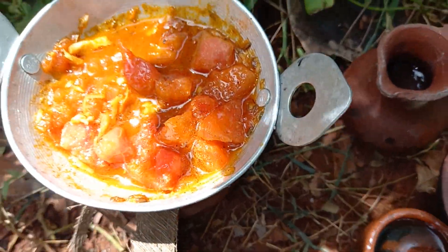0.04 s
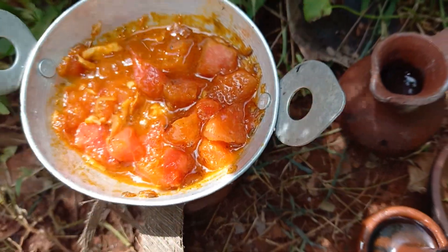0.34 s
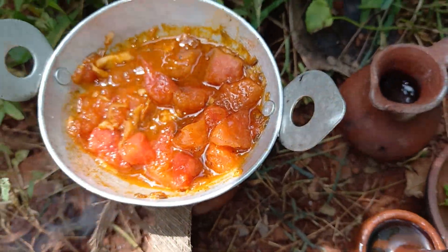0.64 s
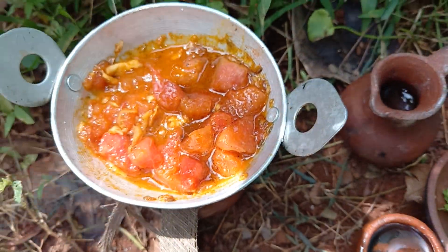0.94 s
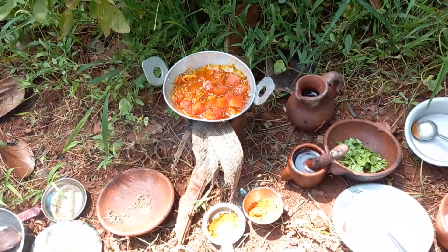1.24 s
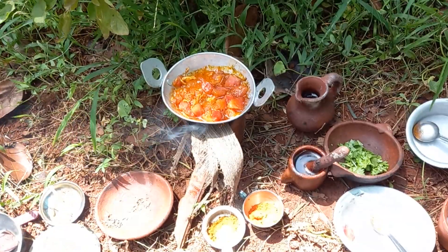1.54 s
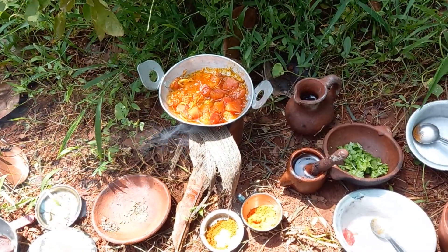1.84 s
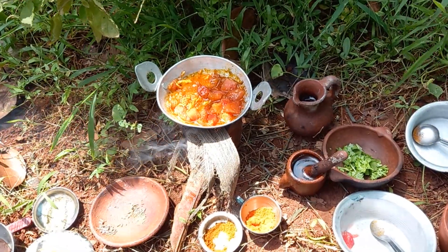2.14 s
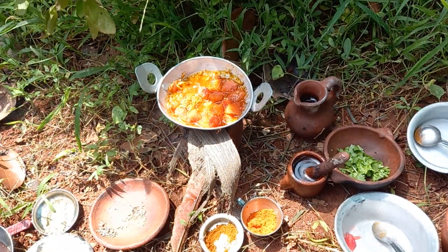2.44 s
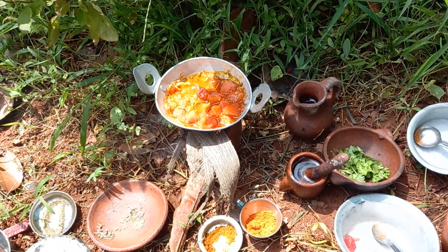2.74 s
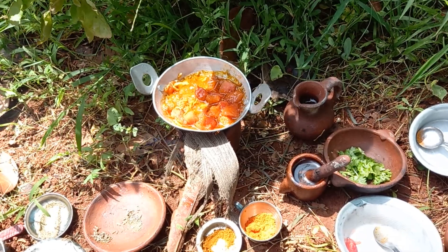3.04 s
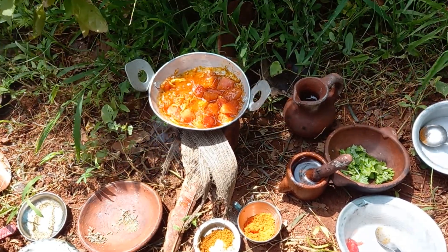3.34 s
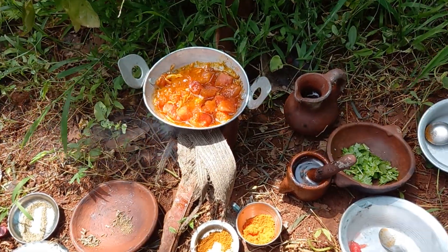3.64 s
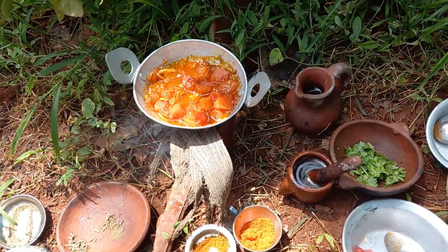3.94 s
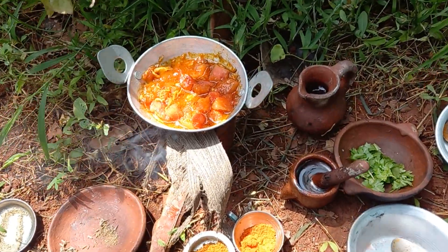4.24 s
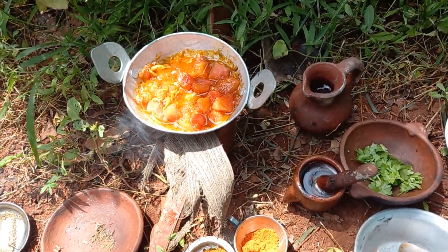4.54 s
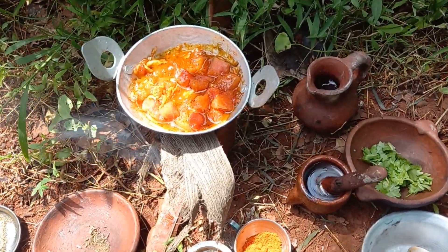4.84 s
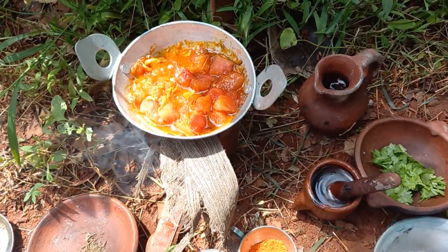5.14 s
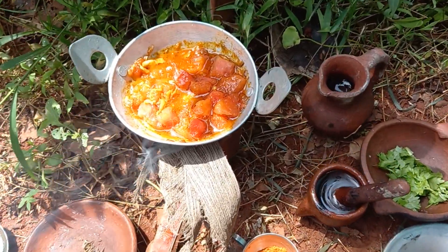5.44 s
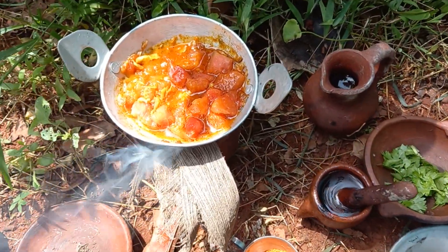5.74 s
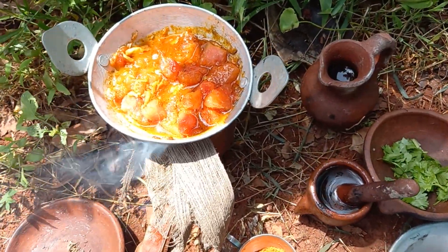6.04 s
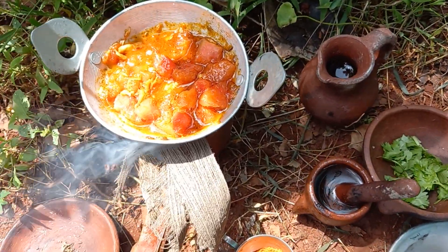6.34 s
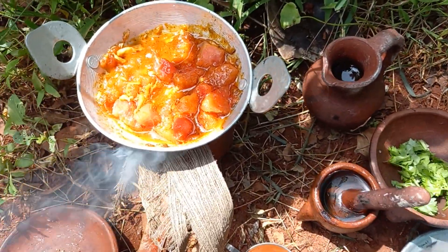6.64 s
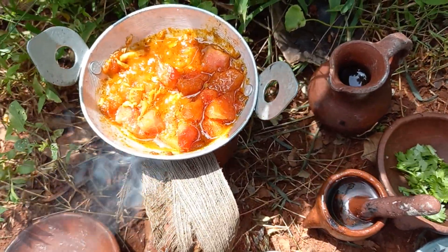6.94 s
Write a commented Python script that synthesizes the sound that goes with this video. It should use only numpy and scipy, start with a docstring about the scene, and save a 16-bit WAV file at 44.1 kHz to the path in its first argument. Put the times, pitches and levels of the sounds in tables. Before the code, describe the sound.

A crow gives four loud, rasping caws near the microphone, the third the loudest, followed by a string of fainter, echoing caws from the trees. A small bird whistles thinly before and between them, and a distant rooster crows toward the end. Light wind bumps the microphone throughout, with a soft scuff and a brief faraway engine drone early on, over faint outdoor hiss and leaf noise.

```python
"""Outdoors among trees a house crow flies over, cawing harshly four times close by, then on from
the trees: its syrinx makes rough pulses that throat resonances filter and trunks and leaves scatter.
A small bird whistles thin arcs, a rooster crows far off and an insect trills faintly. Light wind rumbles
and thumps on the microphone, a distant engine drones for a moment and something scuffs softly.
Behind it all a faint high hiss of air lies over soft foliage noise, with a few faint sharp clicks."""
import sys
import numpy as np
from scipy import signal
from scipy.fft import rfft, irfft, next_fast_len
from scipy.io import wavfile
from scipy.ndimage import uniform_filter1d

SR = 44100
rng = np.random.default_rng(int(sys.argv[2]) if len(sys.argv) > 2 else 0)


def transcribe(signal):
    """Save signal, clipped to [-1, 1], as a 16-bit WAV file at the path in sys.argv[1]."""
    frames = np.atleast_2d(signal).T
    limited = np.clip(frames, -1, 1)
    pcm = np.round(limited * 32767).astype(np.int16)
    wavfile.write(sys.argv[1], SR, pcm)


N = 313110
TIME = np.arange(N) / SR


def from_db(db):
    """Amplitude ratio: a factor of ten for every 20 dB."""
    return 10 ** (np.asarray(db) / 20)


def unit_power(x):
    """Normalisation by the root mean square."""
    return x / np.sqrt(np.mean(x ** 2) + 1e-20)


def since(length):
    """Sample times in seconds from an onset."""
    return TIME[:int(length * SR)]


def ramp(t, length):
    """Linear rise from 0 to 1 over a length of time."""
    return np.clip(t / length, 0, 1)


def curves(rows, t):
    """Linear interpolation of a table's columns at the times t."""
    times, *columns = np.transpose(rows)
    return [np.interp(t, times, column) for column in columns]


def drift(rate, size):
    """Random modulation with rate new values a second."""
    return np.interp(np.arange(size) * rate / SR, np.arange(N // 8), rng.standard_normal(N // 8))


def cycle(hz):
    """Phase as the integral of frequency."""
    return 2 * np.pi * np.cumsum(hz) / SR


def pan(left_db):
    """Level difference between the ears, as two gains."""
    return from_db([[left_db / 2], [-left_db / 2]])


def add(out, start, sound):
    """Superposition: a sound is mixed in at a time, with tapered ends."""
    i = max(int(start * SR), 0)
    n = min(sound.shape[-1], N - i)
    out[:, i:i + n] += (sound * signal.windows.tukey(sound.shape[-1], .06))[..., :n]


def colour(x, spectrum):
    """Spectral shaping by (Hz, dB) points, scaled to unit power."""
    hz, db = np.transpose(spectrum)
    size = next_fast_len(x.shape[-1])
    bins = np.arange(size // 2 + 1) * SR / size + 1
    gain = from_db(np.interp(np.log(bins), np.log(hz), db))
    return unit_power(irfft(rfft(x, size) * gain, size)[..., :x.shape[-1]])


def stereo_noise(spectrum, correlation):
    """Partial coherence: coloured noise that the two channels share in part."""
    mid, side = rng.standard_normal((2, N))
    return colour(np.sqrt(1 + correlation) * mid + np.sqrt(1 - correlation) * side * [[1], [-1]], spectrum)


def resonate(x, hz, width_hz):
    """A damped resonator whose centre frequency may move."""
    turn = np.exp(1j * cycle(np.broadcast_to(hz, x.shape)))
    pole = np.exp(-np.pi * width_hz / SR)
    return (signal.lfilter([1 - pole], [1, -pole], x / turn) * turn).real


def steady(x):
    """Division by the running RMS holds the loudness and keeps the fast rattle."""
    return x / np.sqrt(uniform_filter1d(x ** 2, size=600) + 1e-9)


def scatter(x, t60, dull_hz):
    """Diffuse reflection from trunks and leaves: decaying echoes, different at each ear."""
    t = since(1)
    echoes = rng.standard_normal((2, SR)) * from_db(-60 * t / t60) * (1 - np.exp(-t / 0.0013))
    echoes /= np.sqrt(np.sum(echoes ** 2, axis=1, keepdims=True))
    echoes = signal.sosfilt(signal.butter(1, dull_hz, fs=SR, output="sos"), echoes)
    return signal.fftconvolve(x, echoes, axes=1)[:, :N]


def syrinx(pitch, rough, flutter_hz=96, flutter_depth=0.83, jitter=0.05):
    """Modulation: uneven flutter of the membranes shakes the pitch and chops the pulses and breath."""
    size = len(pitch)
    flutter = np.cos(cycle(flutter_hz * (1 + 0.125 * drift(70.24, size))))
    lurch = .035 * drift(130, size) + .11 * flutter
    phase = cycle(pitch * (1 + rough * (jitter * drift(700, size) + lurch)))
    pulses = unit_power(sum(np.cos(k * phase) for k in range(1, 9)))
    air = rng.standard_normal(size) * (1 + np.cos(phase))
    chop = np.exp(flutter_depth * rough * flutter)
    voice = (pulses + 2 * rough * air) * chop
    return voice, np.cos(phase) * np.sqrt(chop), air * np.sqrt(chop)


def caw_pitch(t, top_hz, break_s, rise_s=.075, rise_octaves=.33, sag_octaves_per_s=4.3):
    """Frequency glide: a caw climbs to its top pitch, holds it, and sags once the voice breaks."""
    octaves_below = rise_octaves * (1 - ramp(t, rise_s)) + sag_octaves_per_s * np.maximum(t - break_s, 0)
    return top_hz * 2 ** -octaves_below


# Spectra of the crow's throat, chest tone, upper resonance and rasp.
# Each row: frequency in Hz, relative level in dB.
THROAT_SPECTRUM = [(350, -42), (850, -9.5), (1150, -3), (1520, 2.5), (1850, -5.5), (2150, -13.5),
                   (3000, -21.5)]
CHEST_SPECTRUM = [(200, -25), (400, -2), (600, 0), (740, -4), (880, -18), (1500, -45)]
UPPER_SPECTRUM = [(1600, -19), (2600, 5), (3300, 9.5), (4200, -22), (6000, -80)]
RASP_SPECTRUM = [(1500, -10), (2400, 3.5), (3700, 1.5), (5500, -3), (7000, -10.5), (10000, -8),
                 (14000, -11.5), (16000, -19)]
# Close caws. Each row: start, length and time until the voice breaks in seconds, top pitch in Hz,
# relative level and dip at the break in dB, throat resonance at the onset and wide open in Hz,
# roughness before the break from 0 to 1, relative levels of chest tone and upper resonance in dB,
# climb of that resonance in Hz per second, relative rasp level in dB, its tilt in dB per octave,
# relative echo level in dB, excess at the right ear in dB, delay at the left ear in milliseconds.
CLOSE_CAWS = [ (1.467, 0.27, 0.13, 650, -29.5, 5, 1430, 1850, .3, -15.5, -20.5, 800, -10.5, 0.5, -5, -0.5, .39),
              (1.913, 0.33, .18, 633, -30, 1, 1560, 1620, 0.54, -12, -21.5, 1807, -13, -0.5, -14.5, 1.5, 0.374),
              (2.371, 0.31, .15, 716.6, -19, 5.5, 1220, 1480, 0.3, -20.5, -18, 2600, -25, 6.5, -19.5, 0.5, 0.332),
              (2.835, 0.33, .14, 715.3, -22, -1, 1240, 1360, 0.57, -19, -21.5, -700, -25, 2.5, -22.5, 2.5, 0.091)]


def crow_close(attack_s=0.094, release_s=0.053, breaking_s=0.049, throat_rest_hz=1490, upper_mid_hz=3297):
    """Source and filter: the syrinx drives two moving resonances, with a chest tone and a breathy rasp."""
    direct, to_trees = np.zeros((2, 2, N))
    for (start, length, break_s, top_hz, top_db, dip_db, onset_hz, open_hz, early_rough, chest_db,
         upper_db, climb_hz_per_s, rasp_db, tilt_db, echo_db, right_db, late_ms) in CLOSE_CAWS:
        t = since(length)
        edges_db = -18.5 * (1 - ramp(t, attack_s)) - 14 * (1 - ramp(length - t, release_s))
        broken_s = np.maximum(t - break_s, 0)
        level_db = top_db + edges_db - dip_db * np.exp(-2 * (broken_s / breaking_s - 1) ** 2)
        rough = np.interp(t, [0, .075, break_s, break_s + breaking_s],
                          [0.696, early_rough, early_rough, 0.62])
        voice, fundamental, air = syrinx(caw_pitch(t, top_hz, break_s), rough)
        throat_hz = np.interp(t, [0, break_s, break_s + 2 * breaking_s],
                              [onset_hz, open_hz, throat_rest_hz])
        throat = steady(resonate(colour(voice, THROAT_SPECTRUM), throat_hz, width_hz=364))
        easing_db = level_db.max() - level_db   # as effort drops, the chest tone lingers
        chest = steady(fundamental + 2.1 * colour(voice, CHEST_SPECTRUM))
        chest *= from_db(chest_db + 0.13 * easing_db)
        upper_hz = upper_mid_hz + climb_hz_per_s * (t - length / 2)
        upper = resonate(colour(voice + air, UPPER_SPECTRUM), upper_hz, width_hz=600)
        upper = steady(resonate(upper, upper_hz, width_hz=600)) * from_db(upper_db - 0.5)
        tilted = [(hz, db + tilt_db * np.log2(hz / 5000)) for hz, db in RASP_SPECTRUM]
        rasp = colour(air + 0.13 * voice, tilted) * from_db(rasp_db - 2 - 0.033 * easing_db)
        arch = np.sqrt(np.hanning(len(t)))   # the brighter parts peak in mid-call
        caw = (throat + arch * upper) * pan(-right_db) + chest * pan(0.77) + arch * rasp * pan(-4.5)
        left, right = caw * from_db(level_db - 3.5)
        late_left = np.interp(t - late_ms / 1000, t, left)
        heard = np.array([late_left, right]) * signal.windows.tukey(len(t), .15)
        add(direct, start, heard)
        add(to_trees, start, heard * from_db(echo_db))
    bright = signal.sosfilt(signal.butter(3, 870, "high", fs=SR, output="sos"), direct)
    early_echoes = from_db(1.5) * scatter(bright, t60=0.043, dull_hz=9300)
    return direct + early_echoes + from_db(10.5) * scatter(to_trees, t60=0.65, dull_hz=2510)


# Caws from the trees. Each row: start and length in seconds, top pitch in Hz, relative level in dB,
# throat resonance in Hz.
DISTANT_CAWS = [(1.08, 0.3, 655.4, -38, 1480), (3.344, 0.31, 684.8, -39.5, 1440),
                (3.906, 0.3, 672.4, -44, 1430), (4.217, 0.22, 668, -54.5, 1860),
                (4.543, 0.25, 654.7, -42, 1474), (4.983, 0.23, 650.5, -40.5, 1460),
                (5.441, 0.24, 640.5, -40, 1410), (6.169, 0.26, 689, -53, 2070)]


def crow_far(attack_s=0.059, release_s=.05):
    """Reverberant field: from the trees the same voice arrives mostly as echoes."""
    out = np.zeros((2, N))
    for start, length, top_hz, level_db, throat_hz in DISTANT_CAWS:
        t = since(length)
        edges_db = -11 * (1 - ramp(t, attack_s) * ramp(length - t, release_s))
        voice, fundamental, air = syrinx(caw_pitch(t, top_hz, break_s=0.14), rough=0.593)
        throat = steady(resonate(colour(voice, THROAT_SPECTRUM), throat_hz, width_hz=340))
        upper = unit_power(resonate(colour(voice, UPPER_SPECTRUM), 3230, width_hz=530))
        caw = throat + from_db(-21.5) * (fundamental + upper) + from_db(-18) * colour(air, RASP_SPECTRUM)
        add(out, start, caw * from_db(level_db + edges_db))
    return from_db(-12.5) * out + from_db(-1.5) * scatter(out, t60=0.63, dull_hz=4770)


def whistle(pitch, level_db):
    """Slight random frequency modulation makes a pure tone quiver."""
    quiver = 1 + 0.006 * drift(419, len(pitch))
    return unit_power(np.sin(cycle(pitch * quiver))) * from_db(level_db)


# Falling whistles. Each row: start and length in seconds, first and final pitch in Hz,
# relative level in dB.
FALLING_WHISTLES = [(.41, 0.028, 7100, 4700, -47), (0.96, 0.097, 7720, 6780, -42.5),
                    (1.148, 0.077, 7640, 6780, -40.5)]
# Arched whistles. Each row: start in seconds, relative level in dB.
ARCHED_WHISTLES = [(2.795, -46), (5.357, -44)]
# The arch they share. Each row: time from the onset in seconds, pitch in Hz, relative level in dB.
ARCH_CONTOUR = [(0, 5400, -7), (.016, 5340, -5.5), (.04, 7120, -1.5), (.078, 6880, -3.5), (.125, 5940, 1),
                (.16, 5720, -8)]


def small_bird(settle_s=0.023, attack_s=0.039):
    """Gliding pure tones fall or arch, and scattering gives each a trail of echoes."""
    out = np.zeros((2, N))
    for start, length, first_hz, last_hz, level_db in FALLING_WHISTLES:
        t = since(length)
        pitch = last_hz + (first_hz - last_hz) * np.exp(-(t / settle_s) ** 1.56)
        add(out, start, whistle(pitch, level_db - 15 * (1 - ramp(t, attack_s))))
    pitch, swell_db = curves(ARCH_CONTOUR, since(ARCH_CONTOUR[-1][0]))
    for start, level_db in ARCHED_WHISTLES:
        add(out, start, whistle(pitch, level_db + swell_db))
    return from_db(-12.5) * out + from_db(-2.5) * scatter(out, t60=0.31, dull_hz=9000)


# The rooster's call. Each row: start and length in seconds, pitch in Hz, relative levels of the
# fundamental and its octave in dB, roughness from 0 to 1.
ROOSTER_SYLLABLES = [(5.69, 0.16, 649.4, -56.5, -63, 0.73), (6.02, .14, 713, -55, -65.5, 0.65),
                     (6.22, 0.37, 737, -52.5, -64, 0.95), (6.64, .2, 812, -66.5, -64, 0.1),
                     (6.86, 0.21, 807.6, -64, -55, 0.12)]


def rooster(edge_s=0.014, sag_hz_per_s=32.3):
    """Pitch jitter makes the first syllables hoarse, the last are clean; reverberation blurs them all."""
    out = np.zeros((2, N))
    for start, length, hz, fundamental_db, octave_db, rough in ROOSTER_SYLLABLES:
        t = since(length)
        phase = cycle((hz - sag_hz_per_s * t) * (1 + 0.0833 * rough * drift(250, len(t))))
        voice = from_db(fundamental_db) * np.sin(phase) + from_db(octave_db) * np.sin(2 * phase) * pan(13)
        add(out, start, np.sqrt(2) * voice * ramp(t, edge_s) * ramp(length - t, edge_s))
    return from_db(-7.5) * out + from_db(-4) * scatter(out, t60=0.99, dull_hz=3000)


# Strength of the wind's rumble. Each row: time in seconds, relative level in dB.
WIND_LEVELS = [(0.0, -52.5), (0.73, -58), (1.92, -44), (2.23, -46.5), (3.46, -53), (3.87, -50),
               (4.55, -52.5), (5.59, -48), (6.13, -51), (6.56, -47), (7.1, -52.5)]
# Its spectrum. Each row: frequency in Hz, relative level in dB.
RUMBLE_SPECTRUM = [(25, -57), (38, -17), (60, -4), (125, 1.5), (200, -7.5), (260, -10.5), (400, -18.5),
                   (600, -27.5), (900, -40)]
# Gusts. Each row: time of the peak in seconds, its level in dB, pitch in Hz, excess on the left in dB.
GUSTS = [(.03, -48.5, 72.6, 28), (1.603, -37, 96.5, 19), (1.825, -34.5, 121, 20), (1.961, -43, 97, 27),
         (2.301, -34.5, 88.5, 16), (2.44, -38.5, 100, 28), (3.866, -43.5, 88, 25), (5.104, -36, 109.4, 9),
         (5.801, -42.5, 86, 14), (6.621, -39.5, 96.4, 30.5)]


def wind(gust_s=0.018):
    """Pressure fluctuations on the microphone: a lumpy rumble, and single gusts as short low thumps."""
    rumble_db, = curves(WIND_LEVELS, TIME)
    out = stereo_noise(RUMBLE_SPECTRUM, correlation=0.85)
    out *= from_db(rumble_db + 1 + 2.1 * drift(20, N)) * pan(1.9)
    t = np.arange(-2 * gust_s, 2 * gust_s, 1 / SR)
    for peak_s, peak_db, hz, left_db in GUSTS:
        phase = cycle(hz * (1 + 0.34 * drift(162, len(t))))
        thump = np.sin(phase) * np.exp(-2 * (t / gust_s) ** 2)
        add(out, peak_s + t[0], thump * from_db(peak_db) * pan(left_db))
    return out


def engine(start_s=1.27, length_s=1.36, idle_hz=132, top_hz=152.1, level_db=-43):
    """Pitch follows engine speed: a distant, wavering drone revs up from idle and back."""
    out, size = np.zeros((2, N)), int(length_s * SR)
    pitch = idle_hz + (top_hz - idle_hz) * np.hanning(size)
    drone = np.sin(cycle(pitch * (1 + 0.049 * drift(50.5, size))))
    add(out, start_s, drone * from_db(level_db + 2.9 * drift(24.25, size)))
    return out


# Spectrum of a scuff on the ground. Each row: frequency in Hz, relative level in dB.
SCUFF_SPECTRUM = [(130, -15), (220, 3), (400, -3), (600, -11), (1100, -25.5)]


def scuff(start_s=1.04, length_s=0.34, level_db=-52):
    """Friction noise: a dull rub that swells and fades."""
    out, size = np.zeros((2, N)), int(length_s * SR)
    rub = colour(rng.standard_normal(size), SCUFF_SPECTRUM) * np.hanning(size)
    add(out, start_s, rub * from_db(level_db) * pan(6))
    return out


# Strength of the background. Each row: time in seconds, foliage level in dB, air hiss level in dB.
BACKGROUND_LEVELS = [(0, -58, -58), (.75, -60.5, -62), (2.6, -61.5, -65), (3.4, -64.5, -69.5),
                     (6.5, -64.5, -68.5), (6.75, -62.5, -61.5)]
# Spectra of the foliage and of the air's hiss. Each row: frequency in Hz, relative level in dB.
FOLIAGE_SPECTRUM = [(250, -48), (500, 1.5), (800, 3), (1050, -1), (1550, 5), (2100, -11), (2600, 1.5),
                    (5000, -4.5), (7500, -11.5), (15000, -42)]
HISS_SPECTRUM = [(1500, 5), (4000, 10), (6000, 6), (9000, 1), (13000, 7.5), (15500, -3)]
# Faint sharp clicks. Each row: start in seconds, relative level in dB, excess on the left in dB.
CLICKS = [(5.685, -62, 18), (5.993, -48.5, -3), (6.658, -51, -11)]


def air_and_foliage(click_decay_s=0.0018):
    """Broadband noise: a high hiss of air over soft foliage; each click is a quickly decaying burst."""
    foliage_db, hiss_db = curves(BACKGROUND_LEVELS, TIME)
    out = stereo_noise(FOLIAGE_SPECTRUM, correlation=0.25) * from_db(foliage_db)
    hiss = stereo_noise(HISS_SPECTRUM, correlation=0.01)
    out += hiss * from_db(hiss_db + 0.59 * drift(12, N)) * pan(-14.5)
    t = TIME[:400]
    for start, level_db, left_db in CLICKS:
        click = rng.standard_normal(len(t)) * np.exp(-t / click_decay_s)
        add(out, start, np.pad(click, len(t) // 10) * from_db(level_db + 3.5) * pan(left_db))
    return out


# Strength of the insect's trill. Each row: time in seconds, level in dB.
TRILL_LEVELS = [(0, -60.5), (.75, -61.5), (1.2, -67)]


def insect(hz=2040, width_hz=340):
    """Narrow-band noise is heard as a faint, wavering trill on one pitch."""
    level_db, = curves(TRILL_LEVELS, TIME)
    trill = [unit_power(resonate(resonate(white, hz, width_hz), hz, width_hz))
             for white in rng.standard_normal((2, N))]
    return np.array(trill) * from_db(level_db)


def scene(crow_enters_s=1.272):
    """Superposition of all sources; the crow sets in abruptly, partway through a distant caw."""
    crow = (crow_close() + crow_far()) * (TIME > crow_enters_s)
    return crow + small_bird() + rooster() + insect() + wind() + engine() + scuff() + air_and_foliage()


def record(dry, low_hz=50, high_hz=15760):
    """Band limiting: the microphone drops the deepest bass, and the top is cut steeply."""
    dry = signal.sosfilt(signal.butter(6, low_hz, "high", fs=SR, output="sos"), dry)
    return signal.sosfilt(signal.ellip(12, .1, 80, high_hz, fs=SR, output="sos"), dry)


dry = scene()
out = record(dry)
transcribe(out)
```